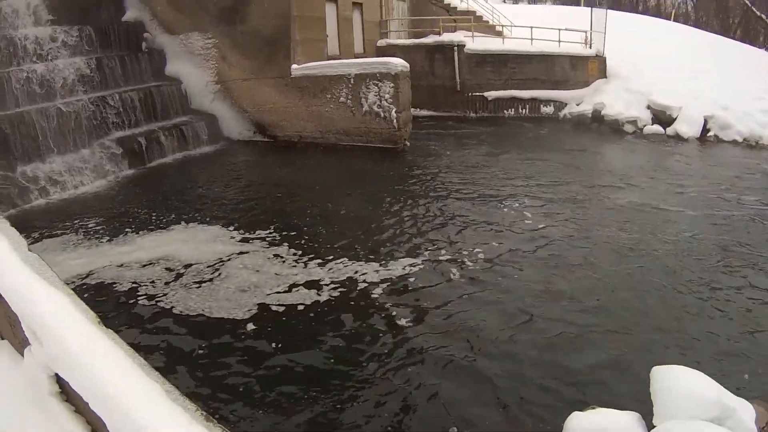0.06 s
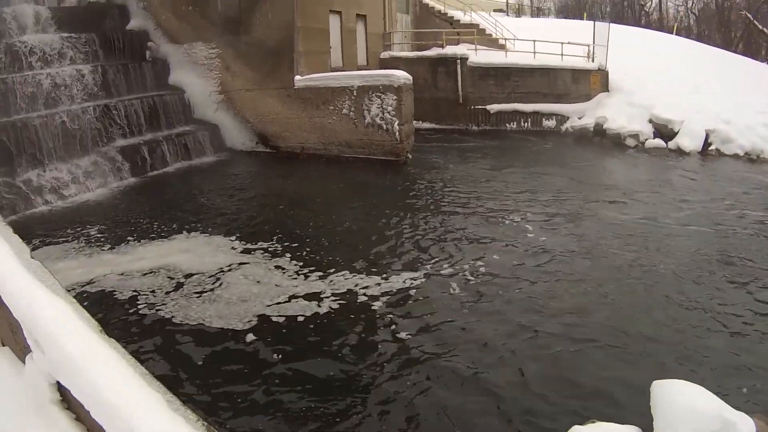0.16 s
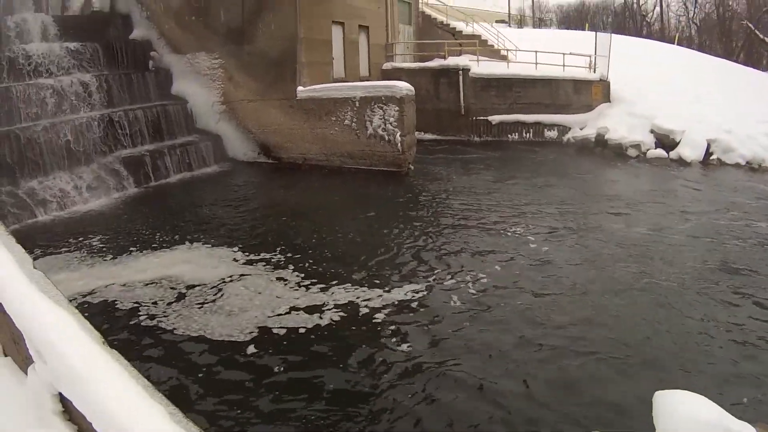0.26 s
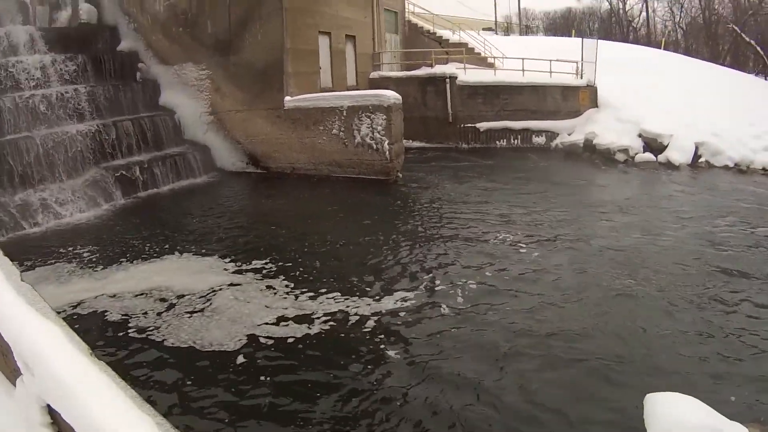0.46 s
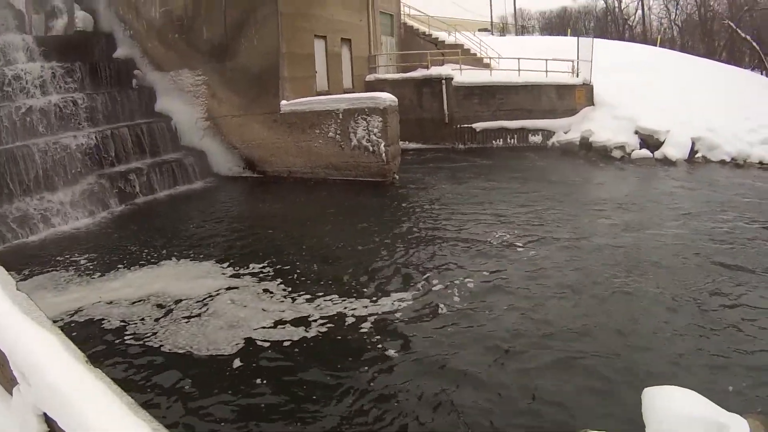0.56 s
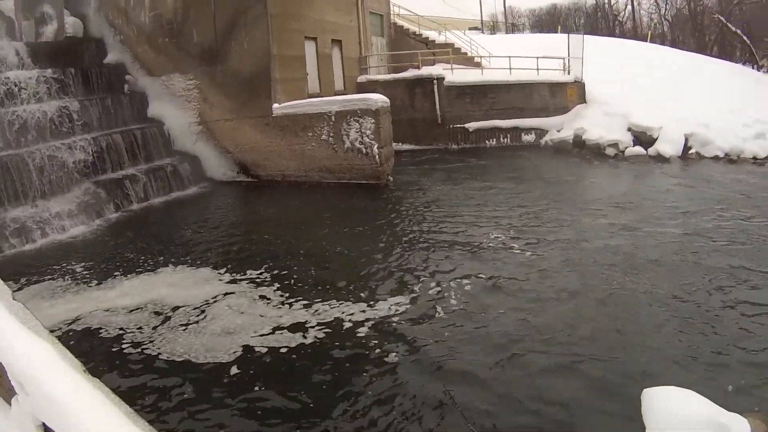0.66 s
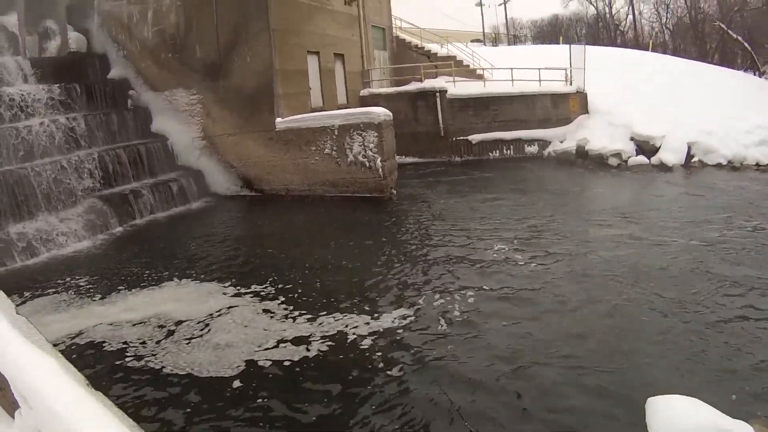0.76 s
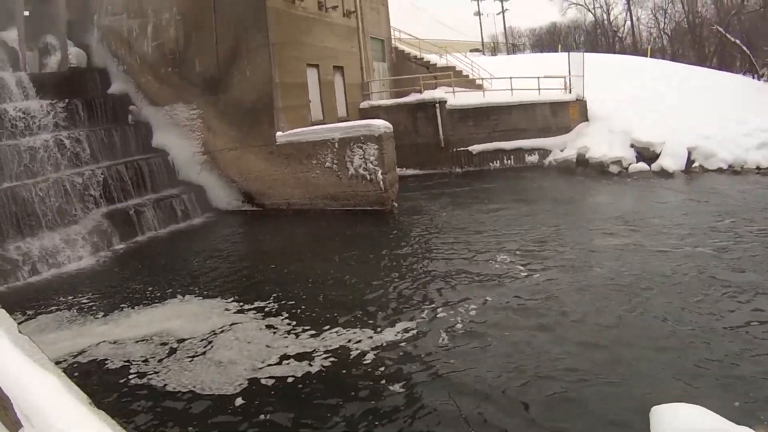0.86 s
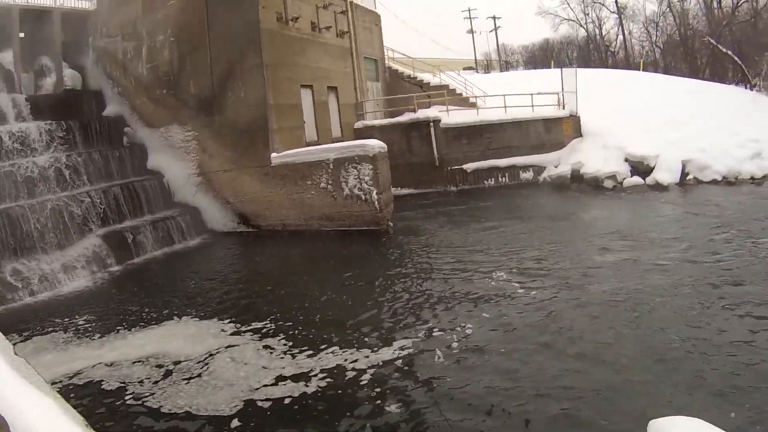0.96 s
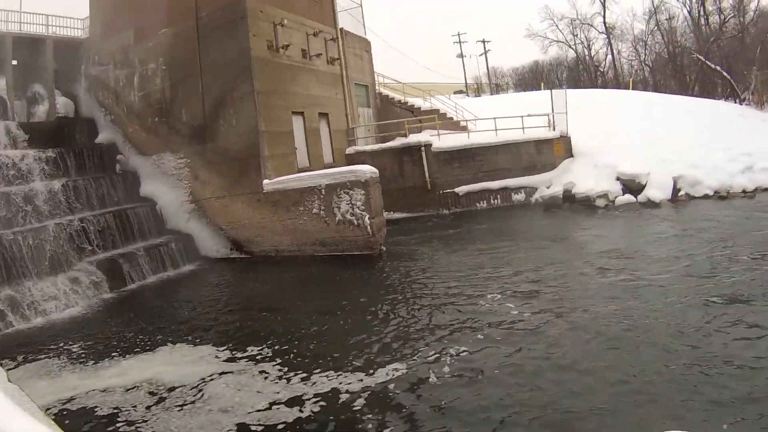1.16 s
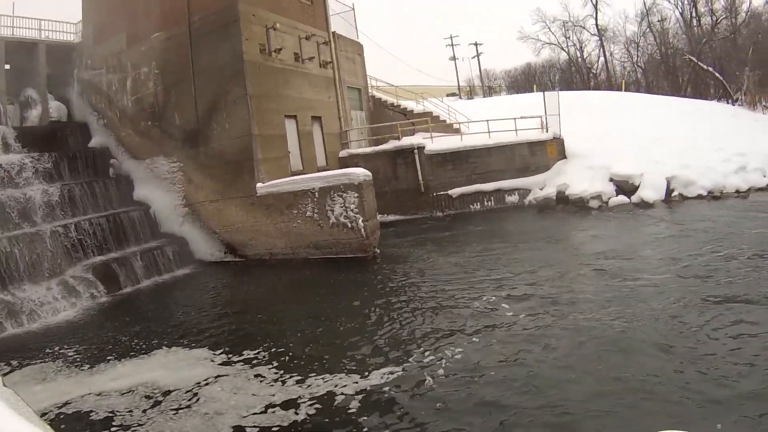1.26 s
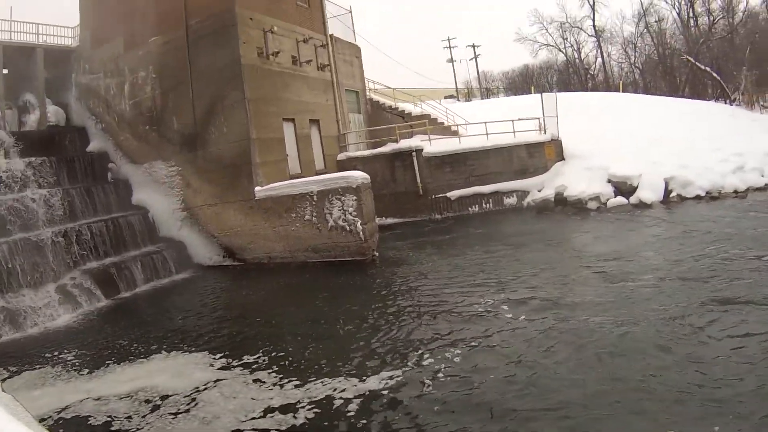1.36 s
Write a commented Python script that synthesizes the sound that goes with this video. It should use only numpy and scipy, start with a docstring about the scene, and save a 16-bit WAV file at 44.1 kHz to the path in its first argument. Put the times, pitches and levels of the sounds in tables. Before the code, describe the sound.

Water pours steadily down a stepped spillway into a pool outdoors, a constant bubbly rush some way off, coloured by a hollow camera housing; soft deep handling thumps come in the first half second, then only faint nudges.

```python
"""Water pours steadily down a stepped concrete spillway into a pool, some way off from the camera's microphone.
From the start to the end, noise and ringing bubbles merge into a rush, coloured by the hollow camera housing.
Under it runs a handling rumble of low noise, strongest near 0.35 s and faintest at the end.
Soft, deep thumps, swelling and fading low tones, rock the moving camera in the first 0.55 s.
After that only faint nudges of the same kind remain."""
import sys
import numpy as np
from scipy import signal
from scipy.fft import rfft, irfft, next_fast_len
from scipy.io import wavfile
from scipy.ndimage import uniform_filter1d, map_coordinates

SR = 44100
rng = np.random.default_rng(int(sys.argv[2]) if len(sys.argv) > 2 else 0)


def to_wav(s):
    """Save 16-bit WAV."""
    ch = np.atleast_2d(s).T  # columns
    pcm = np.round(np.clip(ch, -1, 1) * 32767)  # PCM
    wavfile.write(sys.argv[1], SR, pcm.astype(np.int16))


N = 61740  # 1.4 s


def amp(db):
    """Turn decibels into linear gain."""
    return 10 ** (np.asarray(db) / 20)


def unit(x):
    """Scale to an rms of 1."""
    return x / np.sqrt(np.mean(x ** 2) + 1e-20)


def along(points, hz):
    """Interpolate (f/Hz, value) points on a logarithmic frequency axis."""
    point_hz, values = np.transpose(points)
    return np.interp(np.log(hz + 1), np.log(point_hz + 1), values)


def wobble(rate):
    """Draw a smooth random curve through `rate` random knots a second."""
    knots = rng.standard_normal(256)
    return map_coordinates(knots, [np.arange(N) * rate / SR], mode="wrap")


def filtered(x, response):
    """Multiply the spectrum of x by a gain that depends on frequency."""
    m = next_fast_len(N + SR // 2)  # padded so that ringing does not wrap round
    hz = np.fft.rfftfreq(m, 1 / SR)
    return irfft(rfft(x, m) * response(hz), m)[:N]


def coloured(x, spectrum):
    """Filter x by a table of relative levels over frequency, then scale it to an rms of 1."""
    return unit(filtered(x, lambda hz: amp(along(spectrum, hz))))


def patchy_noise(patchy_db):
    """White noise whose gain varies in random patches of time and frequency."""
    cells = signal.stft(rng.standard_normal(N), nperseg=256)[2]
    field = rng.standard_normal(cells.shape)
    field = uniform_filter1d(field, size=4, axis=0)  # smooth over frequency
    field = uniform_filter1d(field, size=12, axis=1)  # smooth over time
    return signal.istft(cells * amp(patchy_db * unit(field)), nperseg=256)[1][:N]


# handling rumble at the microphone: f/Hz, relative level/dB
RUMBLE_SPECTRUM = [(8, -6.5), (18, -6), (35, 3), (52, 0.5), (66, -1), (85, -36), (130, -62)]
# course of the rumble: t/s, level/dB
RUMBLE_LEVEL = [(0, -49), (.13, -44.5), (.35, -43), (.6, -45.5), (.75, -48), (.92, -46.5), (1.1, -46),
                (1.2, -49.5), (1.4, -53.5)]


def rumble():
    """The hand-held camera rumbles faintly as it moves: low noise under a changing level."""
    level_db = np.interp(np.arange(N) / SR, *np.transpose(RUMBLE_LEVEL))
    return amp(level_db) * coloured(rng.standard_normal(N), RUMBLE_SPECTRUM)


# thumps and nudges on the camera: t/s at the crest, level/dB at the crest, f/Hz at the crest, rise/s, fall/s
THUMPS = [(0.13, -36, 45.6, 0.012, 0.025), (0.2128, -26, 56.5, 0.0087, 0.034),
          (0.2443, -29, 78, 0.011, .012), (.2595, -19, 56, 0.0057, 0.022), (.338, -39.5, 36.8, 0.013, .025),
          (.395, -28.5, 25.8, 0.013, 0.034), (0.4286, -12, 44.7, .012, 0.017),
          (.464, -23, 41.7, 0.03, .015), (.503, -17.5, 49, 0.012, 0.024), (0.538, -20, 42, 0.0082, 0.015),
          (.680, -39.5, 49, 0.039, 0.05), (.980, -42.5, 51, 0.019, 0.032),
          (1.054, -37.5, 35.8, 0.016, .020), (1.31, -42.5, 54.7, 0.036, 0.027)]
THUMP_SAG_OCT_PER_S = 2.7  # rate at which the pitch drops, at the crest


def thumps():
    """Each soft bump rocks the camera through a swing or two, sagging in pitch."""
    out = np.zeros(N)
    for crest_s, level_db, hz, rise_s, fall_s in THUMPS:
        t = np.arange(N) / SR - crest_s
        swell = np.exp(-(t / np.where(t < 0, rise_s, fall_s)) ** 2)
        cycles = hz * t * 2 ** (-THUMP_SAG_OCT_PER_S * t / 2)
        out += amp(level_db) * swell * np.sin(2 * np.pi * cycles)
    return out


# dull roar at the foot of the spillway: f/Hz, relative level/dB
PLUNGE_SPECTRUM = [(40, -22), (90, 1), (140, 3), (190, -3.5), (260, -12), (500, -51)]
PLUNGE_DB = -63.5  # rms before the surges


def plunge():
    """Water plunging into the pool makes a dull roar: low noise."""
    return amp(PLUNGE_DB) * coloured(rng.standard_normal(N), PLUNGE_SPECTRUM)


# rush of the water as the housing colours it, for sheets and bubbles: f/Hz, relative level/dB
RUSH_SPECTRUM = [(130, -31), (220, -12), (479, -16.5), (658, -15.5), (813, -13), (1020, -12.5), (1180, -10),
                 (1310, -4.5), (1410, -5.5), (1560, 1), (1870, -13), (2190, -7.5), (2470, -7), (3060, -20),
                 (3340, -10), (3990, -18), (4280, -21), (4930, -10), (6090, -28), (6540, -21.5),
                 (7530, -20), (8520, -32.5), (11300, -33), (13500, -48), (15000, -43)]
SHEET_DB, PATCHY_DB = -47, 0.5  # rms before the surges; depth of the patches


def sheets():
    """Sheets of water breaking on the steps merge into slightly patchy noise."""
    return amp(SHEET_DB) * coloured(patchy_noise(PATCHY_DB), RUSH_SPECTRUM)


SURGE_DB, SURGES_PER_S = 0.33, 5.16  # depth of the uneven flow; random knots per second


def wash():
    """Sheets and plunge swell and ease together with the uneven flow."""
    return (sheets() + plunge()) * amp(SURGE_DB * wobble(SURGES_PER_S))


BUBBLE_DB, BUBBLES_PER_S = -54, 2600  # rms of all bubbles together, before the housing
BUBBLE_HZ, BUBBLE_SPREAD_OCT = 2179, 0.902  # middle starting pitch and its scatter
BUBBLE_CYCLES, BUBBLE_RISE = 12.8, .12  # starting-pitch cycles in one lifetime; share of pitch gained in it
BUBBLE_SIZE_DB = 1.5  # scatter of strength


def bubbles():
    """Dense small bubbles blend into the wash; each rings for some cycles, rising in pitch."""
    draws = rng.random((int(BUBBLES_PER_S * N / SR), 4))
    when, pitch, turn, size = draws.T[:, :, None]
    # two uniform draws make one bell-shaped scatter of pitch
    octaves = BUBBLE_SPREAD_OCT * np.sqrt(-2 * np.log(1 - pitch)) * np.cos(2 * np.pi * turn)
    hz = np.clip(BUBBLE_HZ * 2 ** octaves, 300, 13000)
    k = np.arange(SR // 50)  # samples since the start, 20 ms at most
    age = np.minimum(hz * k / SR / BUBBLE_CYCLES, 2)  # in lifetimes, cut off after two
    cycles = BUBBLE_CYCLES * age * (1 + BUBBLE_RISE * age / 2)
    ring = np.sin(2 * np.pi * cycles) * np.exp(-np.pi * age) * (age < 2)
    strength = amp(-BUBBLE_SIZE_DB * np.log(1 - .98 * size))  # a few are clearly stronger
    position = (when * N).astype(int) + k
    train = np.bincount(position.ravel(), (strength * ring).ravel(), N)[:N]
    return amp(BUBBLE_DB) * coloured(train, RUSH_SPECTRUM)


# narrow peaks and notches of the camera housing round the microphone: f/Hz, half width/Hz, level/dB
HOUSING = [(1517, 29, 1), (2676, 55, -3), (3340, 94, 2), (3750, 69, 1), (4890, 58, -1.5), (5030, 85, 2),
           (5280, 150, -3.5), (6710, 180, 3.5), (6900, 144, -5), (9920, 400, 2.5), (10750, 130, -2),
           (15100, 350, -11)]


def housing(hz):
    """The hollow housing resonates: bell-shaped peaks and notches add up in decibels."""
    return amp(sum(db * np.exp(-((hz - centre) / width) ** 2) for centre, width, db in HOUSING))


def scene():
    """The spillway through the housing, with the camera's own low noises beside it."""
    water = filtered(wash() + bubbles(), housing)
    return (rumble() + thumps() + water)[None]


TOP_HZ = 15200  # band limit of the camera


def record(dry):
    """The camera keeps nothing at or above its band limit."""
    return np.array([filtered(channel, lambda hz: hz < TOP_HZ) for channel in dry])


dry = scene()
out = record(dry)
to_wav(out)
```